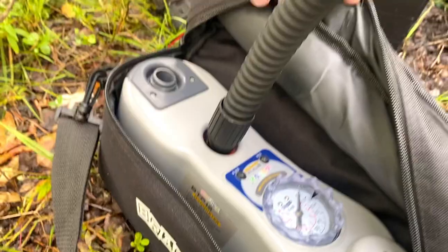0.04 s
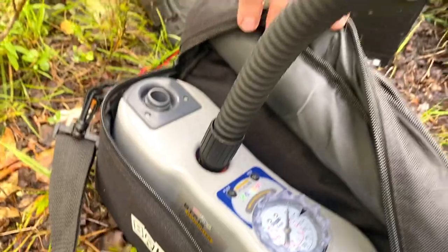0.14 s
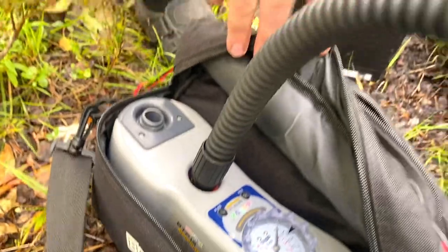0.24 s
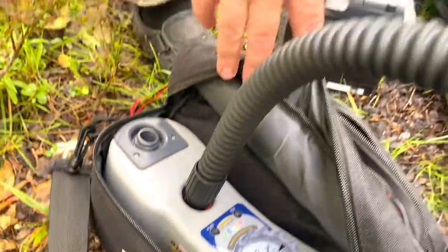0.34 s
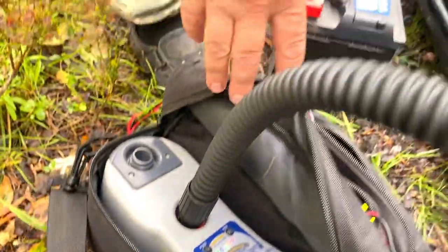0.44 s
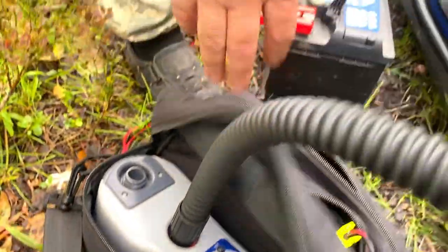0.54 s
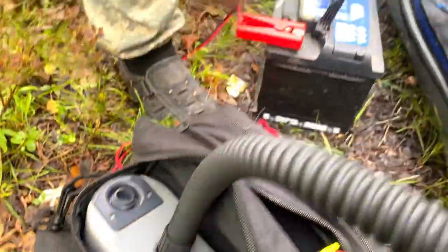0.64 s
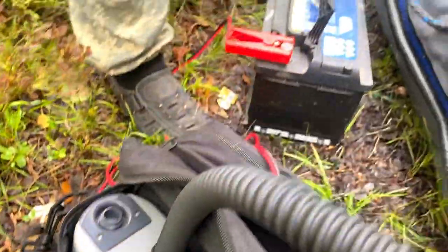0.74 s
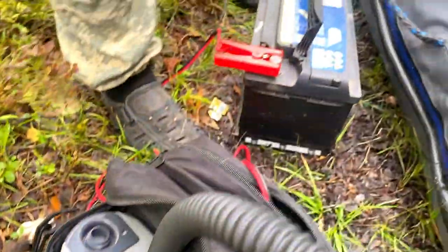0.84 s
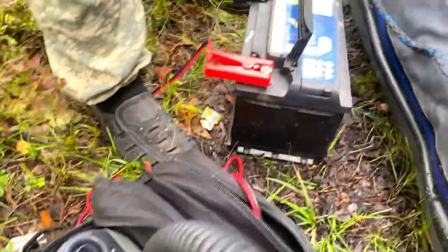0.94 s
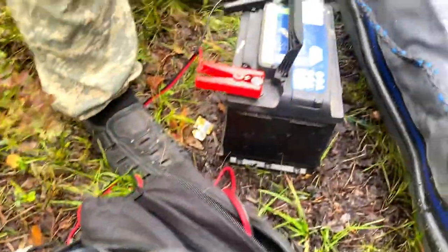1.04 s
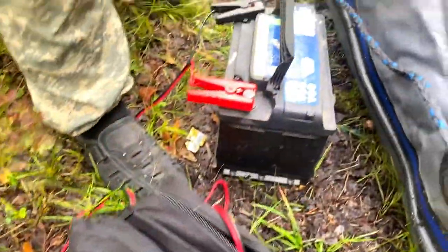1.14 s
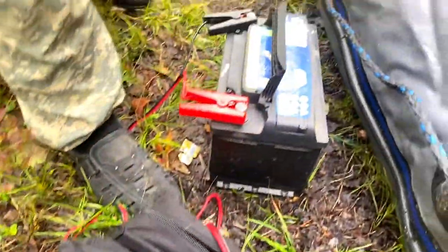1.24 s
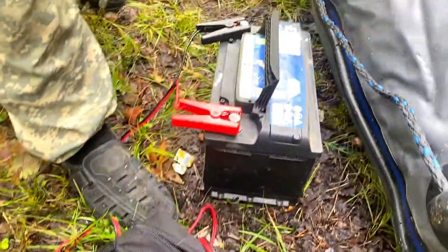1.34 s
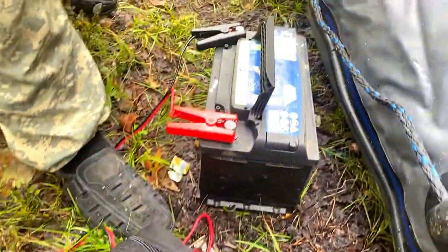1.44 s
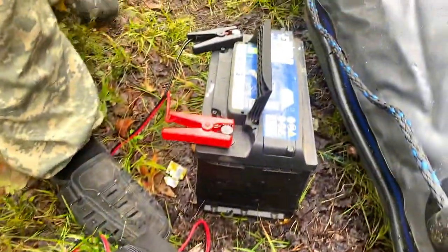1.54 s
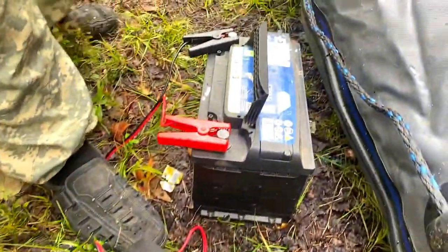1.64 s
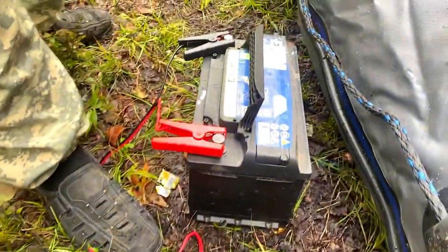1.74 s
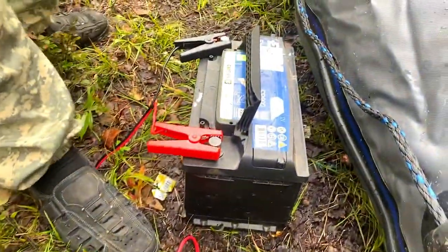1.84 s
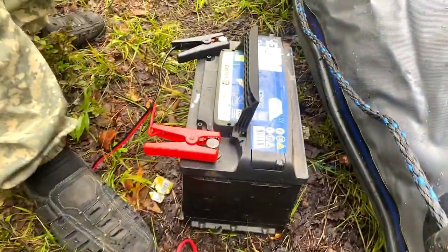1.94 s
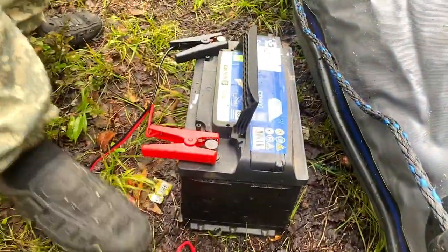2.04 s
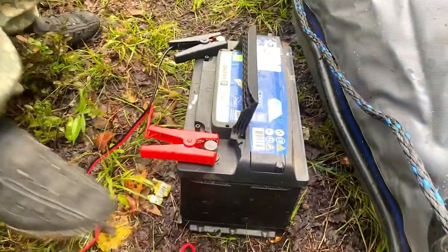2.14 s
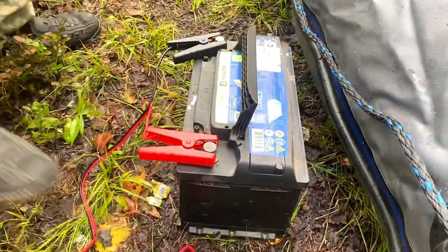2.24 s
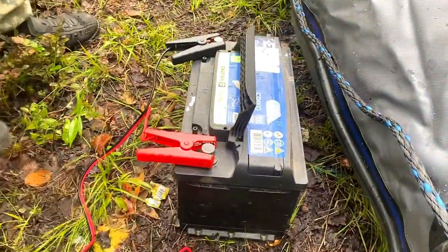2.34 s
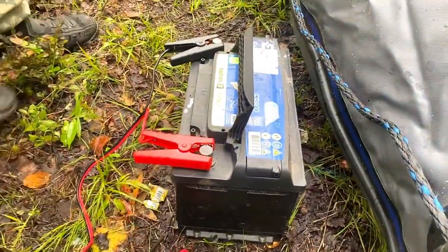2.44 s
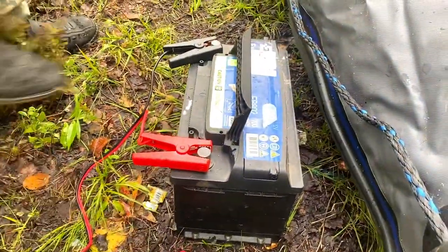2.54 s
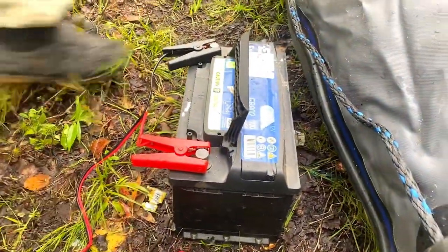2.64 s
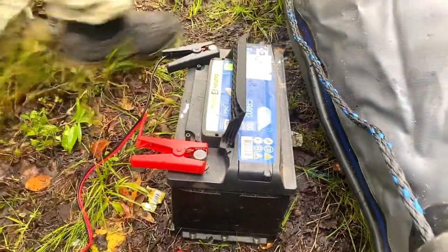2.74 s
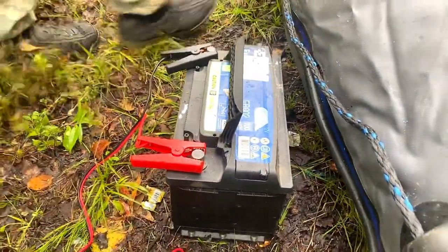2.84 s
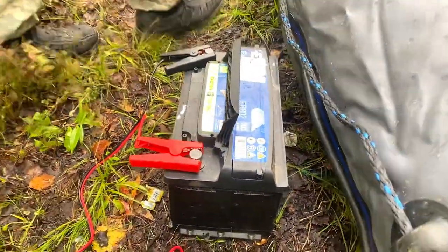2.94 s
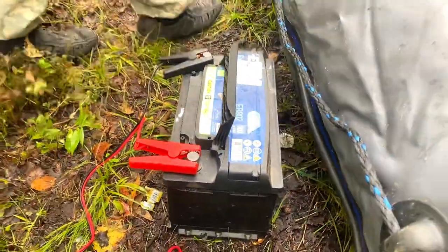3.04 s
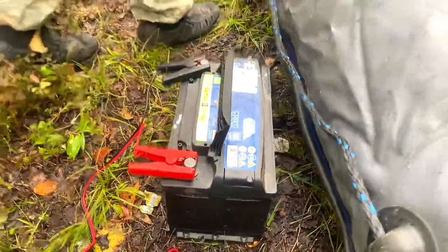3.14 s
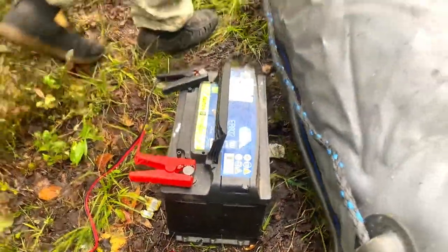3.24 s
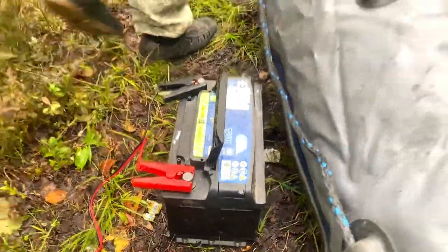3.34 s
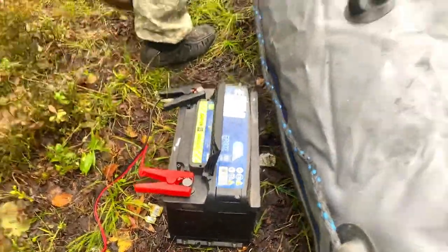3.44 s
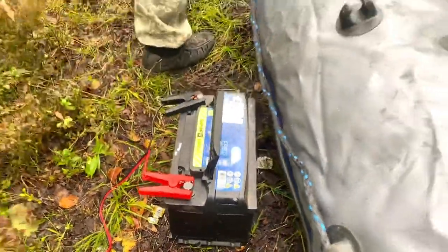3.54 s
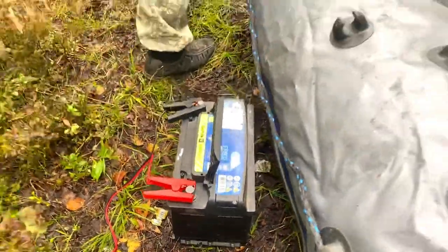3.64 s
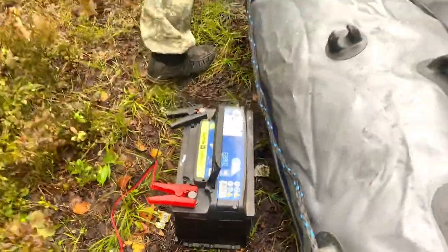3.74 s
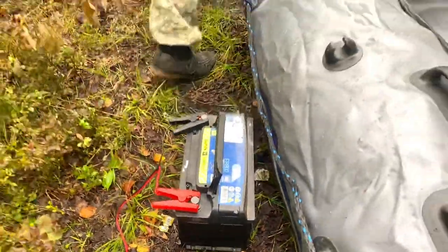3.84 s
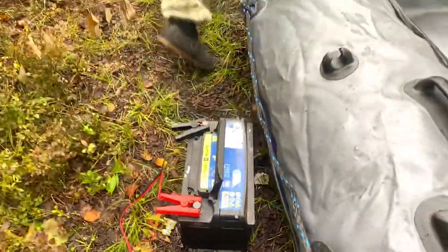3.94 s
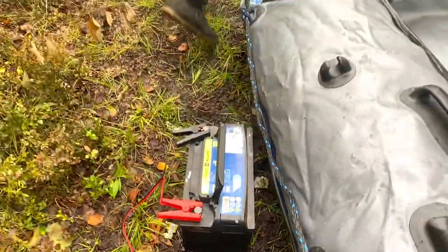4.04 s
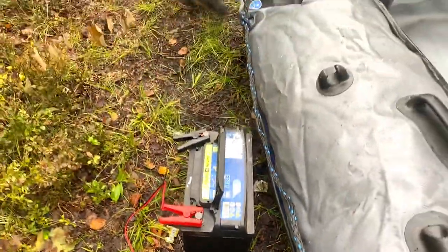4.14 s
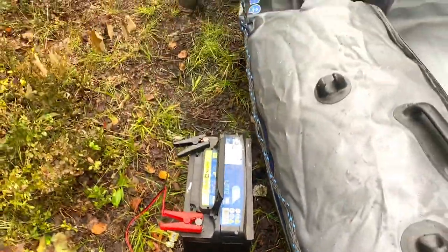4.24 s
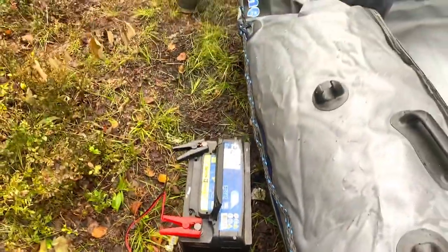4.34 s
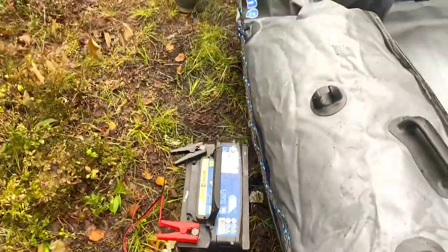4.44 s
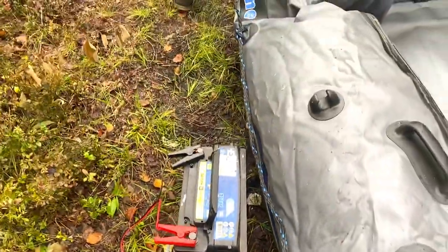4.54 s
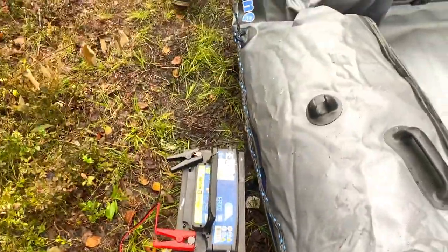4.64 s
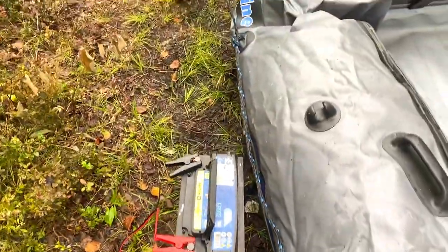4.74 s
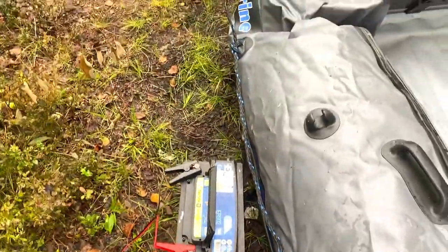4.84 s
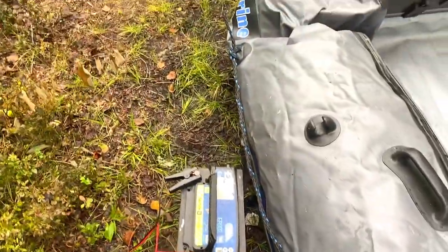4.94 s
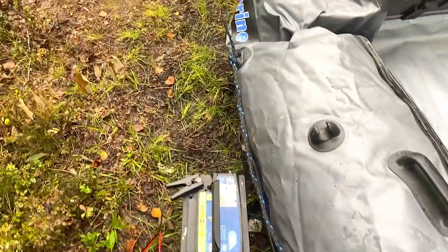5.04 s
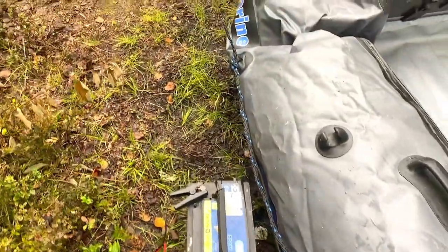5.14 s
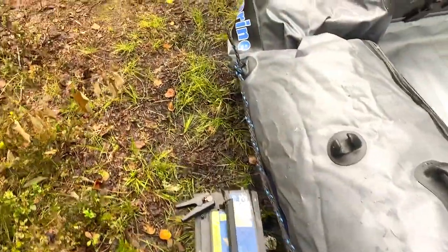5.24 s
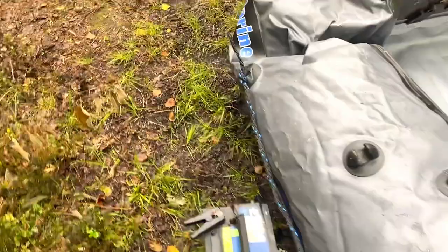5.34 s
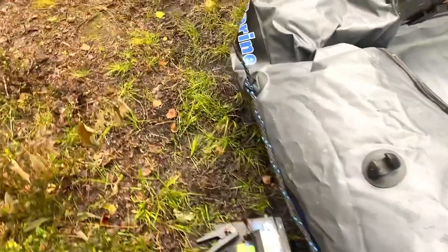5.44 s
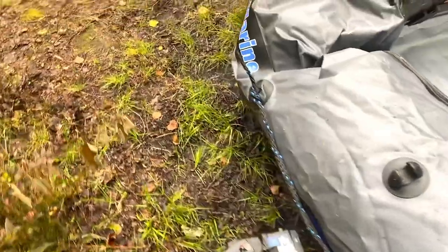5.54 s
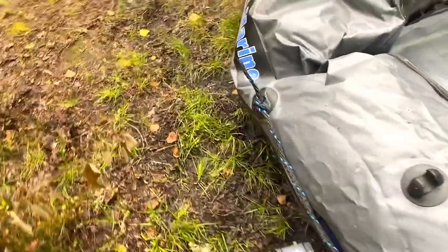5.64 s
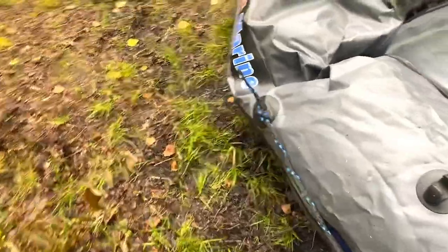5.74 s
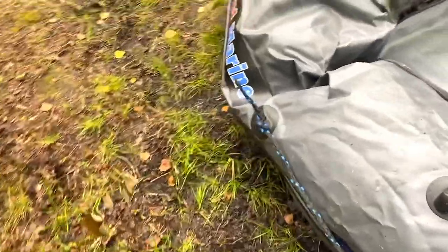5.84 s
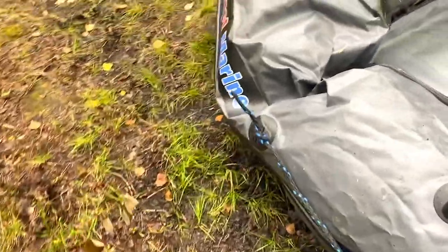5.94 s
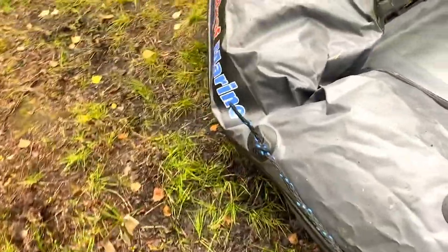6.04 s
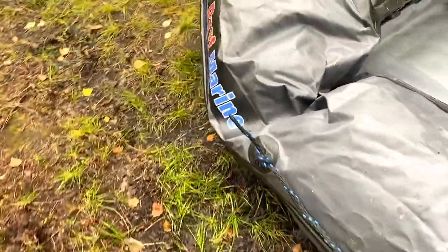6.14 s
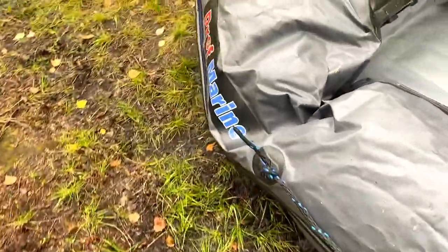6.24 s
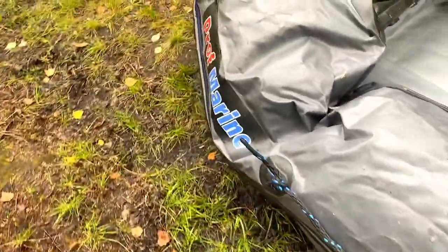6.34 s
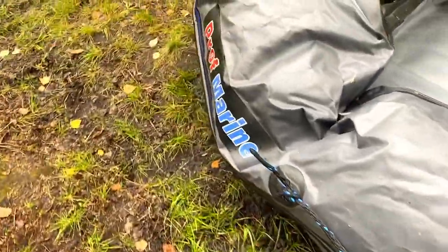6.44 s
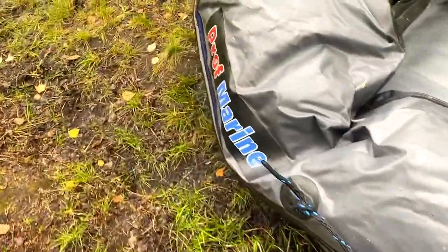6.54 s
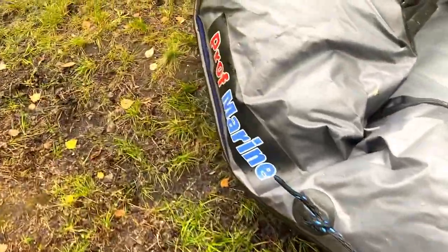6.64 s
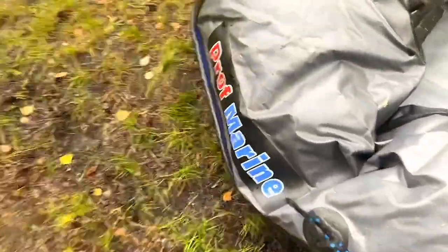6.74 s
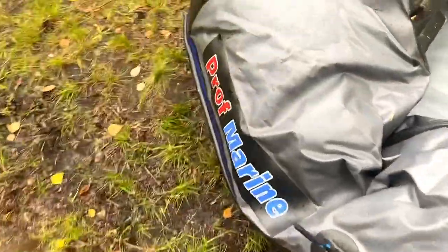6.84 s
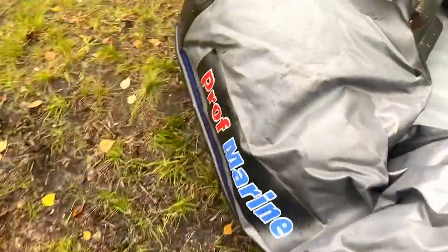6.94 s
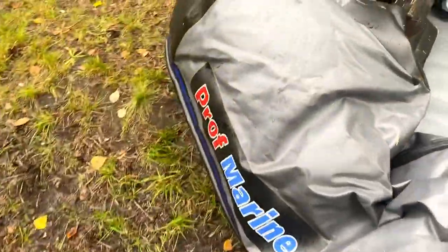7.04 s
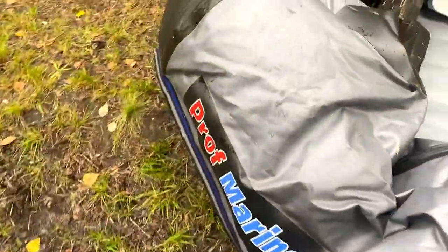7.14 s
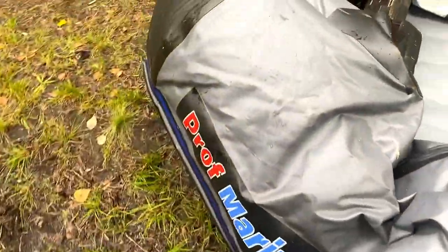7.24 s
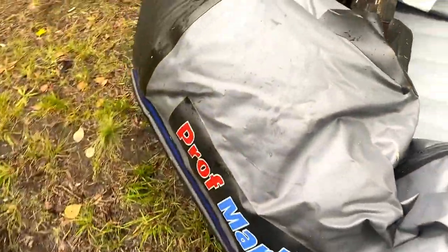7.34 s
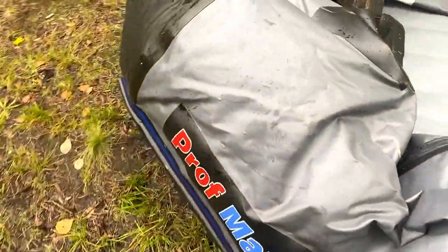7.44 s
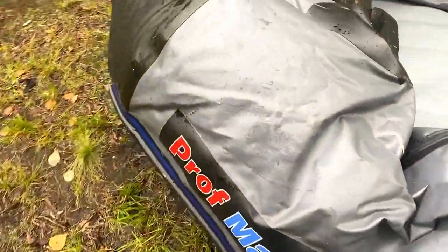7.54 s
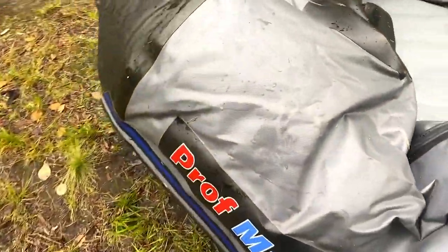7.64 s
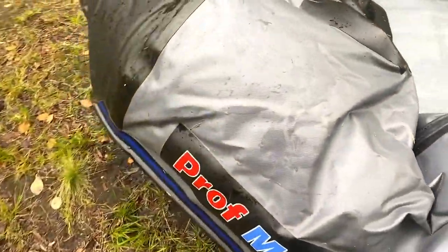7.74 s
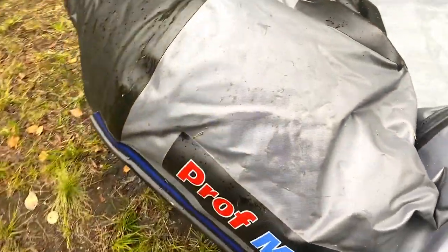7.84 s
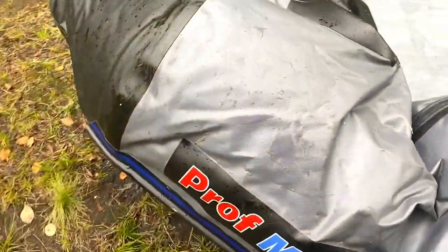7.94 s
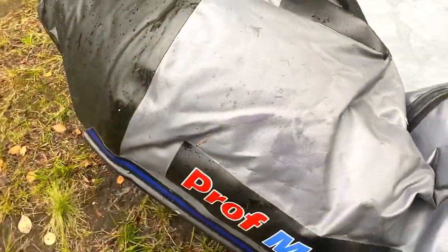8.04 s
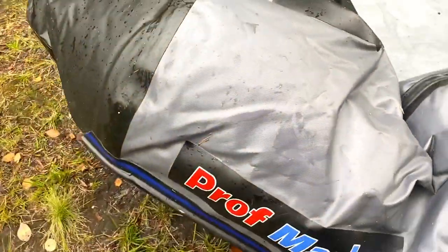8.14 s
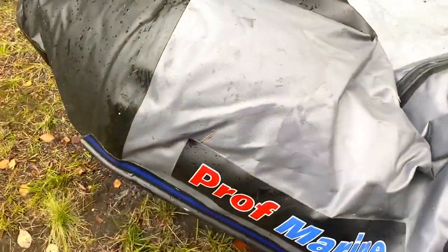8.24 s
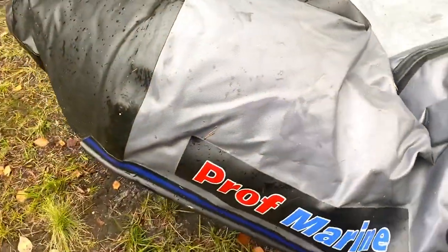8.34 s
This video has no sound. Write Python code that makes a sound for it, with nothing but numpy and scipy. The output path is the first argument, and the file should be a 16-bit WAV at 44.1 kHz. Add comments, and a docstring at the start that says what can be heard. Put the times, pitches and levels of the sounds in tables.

```python
"""A lake shore: a 12-volt blower pump fills a PVC boat, heard from a hand-held phone that drifts away from it.
The rotor hums once a turn and whines on higher multiples; a bearing adds tones between them; filtered noise is the air.
Whine, bearing and most of the air fade with distance; the hum and the roar in the hose follow level curves of their own.
Single tones swell or dip as the microphone crosses their lobes, and random echoes make the whine waver.
In the second half fabric swishes and ticks, and a few soft knocks and handling bumps sound."""
import sys
import numpy as np
from scipy import signal
from scipy.fft import rfft, irfft
from scipy.io import wavfile
from scipy.ndimage import map_coordinates

SR = 44100
rng = np.random.default_rng(int(sys.argv[2]) if len(sys.argv) > 2 else 0)


def file_out(sig):
    """Save sig as 16-bit WAV at sys.argv[1]."""
    # one column per channel
    cols = np.atleast_2d(sig).T
    # limit, then scale
    lim = np.clip(cols, -1, 1)
    pcm = np.round(lim * 32767).astype(np.int16)
    wavfile.write(sys.argv[1], SR, pcm)


N = 370440
TIME = np.arange(N) / SR  # [s]
SLIP = .5632  # slip rate of the bearing [per turn of the rotor]
NEAR_M = .5  # distance at which the near levels hold [m]

# bands in which the noise levels are given: name: (low edge [Hz], high edge [Hz])
BANDS = dict(case=(130, 300), hose=(550, 880), rush=(1440, 1800), spray=(3300, 4100), hiss=(9300, 10130),
         sizzle=(11640, 11980), cloth=(9000, 11000), hand=(35, 130))


def undb(db):
    """Decibels to gain."""
    return 10 ** (np.asarray(db) / 20)


def curve(table):
    """The value column of a timed table, drawn as straight lines through every sample."""
    seconds, values = np.transpose(table)
    return np.interp(TIME, seconds, values)


def bell(s, half):
    """A smooth rise and fall around time s."""
    return np.exp(-.5 * ((TIME - s) / half) ** 2)


def swells(table):
    """Envelope of (time [s], level [dB], half length [s]) events that add in power."""
    return np.sqrt(sum((undb(db) * bell(s, half)) ** 2 for s, db, half in table))


def walk(rate):
    """Smooth chance with spread near 1 that heads for a new random value rate times a second."""
    values = rng.standard_normal(8192)
    place = TIME * rate
    i = place.astype(int)
    part = place - i
    ease = part * part * (3 - 2 * part)
    return values.take(i, mode="wrap") + np.diff(values).take(i, mode="wrap") * ease


def noise(colour, band):
    """Noise of a (frequency [Hz], level [dB]) colour with unit rms inside the band."""
    hz = np.arange(N // 2 + 1) * SR / N
    points, db = np.transpose(colour)
    gain = undb(np.interp(np.log(hz + 1), np.log(points), db))
    # steeper fall outside the table
    gain *= np.minimum(hz / points[0], 1) ** 2
    gain *= np.minimum(points[-1] / (hz + 1), 1) ** 2
    inside = (hz > band[0]) & (hz < band[1])
    band_rms = np.sqrt(np.mean(gain ** 2 * inside))
    return irfft(rfft(rng.standard_normal(N)) * gain, N) / band_rms


def tone(angle, db):
    """One sine partial at the given phase angle and rms level, with a random starting phase."""
    return np.sqrt(2) * undb(db) * np.sin(angle + rng.uniform(0, 2 * np.pi))


def faded(far, db, fall_db):
    """Level in dB after far doublings of the distance."""
    return db - fall_db * far


def lobes(multiple):
    """Swells and dips in dB of one tone as the microphone crosses its lobes (+) and nulls (-)."""
    # (multiple of the rotor speed, time [s], half length [s], level change [dB])
    crossings = [(3, 0.088, 0.28, 8), (3, 1.16, 0.25, -8.5), (3, 2.4, 0.52, 5), (3, 5.37, 0.24, 7),
                 (4, 0.24, 0.28, 10), (4, 3.45, 0.59, 10), (4, 4.8, 0.53, 8), (4, 6.14, 0.11, 6),
                 (4, 7.9, 0.21, 3), (4, 8.25, 0.07, -12), (5, 0.31, 0.26, -8), (5, 0.78, 0.45, 4),
                 (5, 5.26, 0.18, 3.5), (5, 6.2, 0.75, -5), (6, 1.6, 0.18, -21), (6, 2.34, 0.21, 5.5),
                 (7, 0.51, 0.26, 10.5), (7, 2.3, 0.46, -7), (7, 4.26, 0.49, 11.5), (7, 8, 0.33, 23.5),
                 (9, 0.16, 0.26, -0.5), (9, .72, 0.045, -14), (9, 1.17, 0.043, -8), (9, 1.75, .4, 2),
                 (9, 2.68, .1, -9), (9, 4.25, 0.075, 5.5), (9, 4.83, 0.16, -4), (9, 5.22, 0.079, 6),
                 (9, 6.2, .12, -8), (9, 6.35, .074, 5), (9, 6.76, 0.15, -9), (9, 7.17, 0.064, 9.5),
                 (9, 7.6, .07, 9), (9, 7.9, .07, -6), (9, 8.12, 0.11, 8), (16.56, 3.55, .17, 8),
                 (16.56, 5.15, .15, 7), (17, 0.95, 0.07, -21), (17, 2, .17, -11), (17, 4.66, .12, -14),
                 (17, 5.05, .2, 5), (17, 5.72, .09, 7), (17, 6.9, 0.38, -9), (18, 0.1, 0.35, 8),
                 (18, 2.84, 0.12, -7), (18, 3.6, 0.3, 2.5), (18, 5.36, 0.19, 4), (18, 8.3, .15, -8),
                 (19, 4.25, 0.42, 9), (22, .3, .3, 7), (23, 0.1, 0.34, 7), (23, .9, .15, -10),
                 (23, 3.7, .28, -19), (24, 0.15, 0.36, 9), (24, 1.2, .3, -9), (24, 2.1, .3, 5),
                 (24, 5.65, .3, 7), (25, .2, .28, 4), (25, 5.1, .5, 5), (26, 0.2, 0.33, 13),
                 (27, 0.46, 0.12, -17), (27, 1.2, 0.3, 6.5), (27, 4.8, 0.35, 6), (27, 5.64, 0.12, -10)]
    return sum(db * bell(s, half) for order, s, half, db in crossings if abs(order - multiple) < .25)


def scattered(angle, db, multiple, echo_db, base_rate=7, rate_per_order=.4):
    """A partial plus echoes off ground and boat, which add and cancel at random, faster for short waves."""
    share = undb(np.minimum(echo_db, 0)) / np.sqrt(2)
    rate = base_rate + rate_per_order * multiple  # [per second]
    angle = angle + rng.uniform(0, 2 * np.pi)
    in_step = (1 + share * walk(rate)) * np.sin(angle)
    quarter_turn_off = share * walk(rate) * np.cos(angle)
    return undb(db) * (in_step + quarter_turn_off) / np.sqrt(.5 + share ** 2)


def handling(grip_db=-58, uneven_db=1.8):
    """The hand on the phone makes a low, uneven rumble that swells when the grip shifts."""
    # colour of the rumble: (frequency [Hz], level [dB])
    hand_colour = [(28, -36), (45, -4.5), (75, 3), (120, 0), (200, -3.5), (320, -5.5), (700, -16)]
    # shifts of the grip, before the unevenness: (time [s], level [dB], half length [s])
    grip_shifts = [(5.45, -55, .15), (6.7, -53, 0.25), (7.14, -45, .06), (7.93, -39.5, 0.065),
                   (7.96, -44, 0.24)]
    rumble = noise(hand_colour, BANDS["hand"])
    return rumble * np.hypot(undb(grip_db), swells(grip_shifts)) * undb(uneven_db * walk(22))


def knocks():
    """Soft blows: each is a low sine that swells and dies within a few cycles."""
    # knocks and bumps: (time [s], peak level of the envelope [dB], pitch [Hz], rise [cycles])
    blows = [(6.643, -38, 116, .7), (6.744, -36, 90, .7), (7.145, -37, 85, .7), (7.679, -35, 110, .8),
             (7.818, -35, 170, .8), (7.859, -22, 250, .35), (7.872, -26, 122, .7), (7.912, -27.5, 78, .6),
             (7.954, -19.5, 300, .45), (7.989, -23, 125, .55), (8.088, -35, 150, .6), (8.218, -35, 100, .7)]
    out = np.zeros(N)
    for s, db, hz, rise_cycles in blows:
        cycles = np.maximum(TIME - s, 0) * hz
        swell = cycles / rise_cycles * np.exp(1 - cycles / rise_cycles)
        out += undb(db) * swell * np.sin(2 * np.pi * cycles)
    return out


def ticks(decay_s=0.005):
    """Stalks and seams snap: a burst of band noise that starts at once and dies in a few milliseconds."""
    # sharp ticks of grass and fabric: (time [s], level at the start [dB], centre [Hz], width [Hz])
    snaps = [(6.803, -34, 10500, 2500), (7.187, -33, 11000, 6000), (7.287, -32, 7000, 9000),
             (7.388, -26, 10000, 11000), (7.396, -23, 5500, 9000)]
    out = np.zeros(N)
    for s, db, hz, width in snaps:
        edges = np.clip([hz - width / 2, hz + width / 2], 200, .45 * SR)
        band = signal.butter(2, edges, "band", fs=SR, output="sos")
        burst = signal.sosfilt(band, rng.standard_normal(N))
        decay = (TIME >= s) * np.exp(-np.clip((TIME - s) / decay_s, 0, 20))
        out += undb(db) * burst / burst.std() * decay
    return out


def fabric(grain_db=1.3, catch_db=1.4, crackle_rate=120, crackle_gain=0.58, crackle_s=0.0019):
    """Sliding fabric catches and slips on its weave: a grainy swish with sparse, short crackles in it."""
    # colour of the sliding fabric: (frequency [Hz], level [dB])
    cloth_colour = [(800, -12), (1500, -1), (3000, -1), (4500, 1), (6000, -3), (8000, -2), (10000, 0),
                    (12500, 2.5), (14000, -2), (15700, -7)]
    # swishes and scuffs of fabric and grass, before the grain: (time [s], level [dB], half length [s])
    scuffs = [(4.93, -49, 0.08), (7.205, -40.5, 0.042), (7.268, -39, 0.028), (7.39, -46, 0.075),
              (8.02, -52, 0.12)]
    snags = (rng.random(N) < crackle_rate / SR) * rng.exponential(size=N)  # crackle_rate a second
    crackle = signal.lfilter([1], [1, -np.exp(-1 / (crackle_s * SR))], snags)
    weave = undb(catch_db * walk(70) + grain_db * walk(600))
    return noise(cloth_colour, BANDS["cloth"]) * swells(scuffs) * np.hypot(weave, crackle_gain * crackle)


def airflow(angle, far, hose_db, chop=0.06, flicker_db=0.7, low_shade=0.05, hiss_shade=0.14, drift=.01):
    """Turbulence booms in the case, roars in the hose and hisses at the intake, chopped lightly once a turn."""
    # colours from low to high: (frequency [Hz], level [dB])
    case_colour = [(50, -30), (90, -13), (130, -11.5), (180, 1.5), (260, -4), (340, -13), (600, 2)]
    hose_colour = [(300, -34), (420, -17), (540, -11.5), (630, -3), (725, 2), (850, -6), (980, -11),
                   (1180, -10), (1400, -44), (2500, -53)]
    rush_colour = [(600, -27), (1000, -2), (1350, 1), (1600, 2.5), (2000, 1), (2500, -5.5), (3000, -21),
                   (5000, -10.5), (9000, -23)]
    spray_colour = [(1200, -6), (2300, 6), (3200, 3.5), (3900, 1.5), (4400, 2), (5050, -7.5), (5550, -13),
                    (6200, -7.5), (7300, -36), (8000, -17), (10000, -37), (15000, -32)]
    hiss_colour = [(4400, 4), (5050, 2), (5550, 7), (6100, -3.5), (7300, -0.5), (7900, 2), (8700, 3),
                   (9200, -2.5), (10200, 2), (10800, -6), (13500, -4), (15500, -24)]
    sizzle_colour = [(10000, -22), (11100, -6), (11750, 1.5), (12500, 2), (13100, -2), (13800, -15),
                     (15000, -27)]
    # strengths before shade and flicker: (level at NEAR_M [dB], fall per doubling of distance [dB])
    case_db = (-44.5, 6)
    rush_db = (-39.5, 3)
    spray_db = (-42.5, 0.76)
    hiss_db = (-46, 6.5)
    sizzle_db = (-42.5, 10)
    # early on the hose and bag shade the intake; the sizzle takes the full depth, the rest a share:
    # (centre [s], half length [s], depth [dB])
    shade = (0.34, 0.31, -6)
    centre, half, depth_db = shade
    shade_db = depth_db * bell(centre, half)
    low_shade_db = low_shade * shade_db

    case = noise(case_colour, BANDS["case"]) * undb(faded(far, *case_db) + low_shade_db)
    drifting = np.cumsum(1 + drift * walk(3))  # the hose resonance wanders with the flow
    roar = map_coordinates(noise(hose_colour, BANDS["hose"]), [drifting], order=3, mode="mirror")
    hose = roar * undb(hose_db)
    rush = noise(rush_colour, BANDS["rush"]) * undb(faded(far, *rush_db) + low_shade_db)
    spray = noise(spray_colour, BANDS["spray"]) * undb(faded(far, *spray_db) + low_shade_db)
    hiss = noise(hiss_colour, BANDS["hiss"]) * undb(faded(far, *hiss_db) + hiss_shade * shade_db)
    sizzle = noise(sizzle_colour, BANDS["sizzle"]) * undb(faded(far, *sizzle_db) + shade_db)
    chopped = (1 + chop * np.sin(angle)) * undb(flicker_db * walk(45))
    return case + hose + (rush + spray + hiss + sizzle) * chopped


def bearing(angle, far, trim_db=-0.1, fall_db=7, fade_db=2.0):
    """The shaft overtakes the ball cage at the slip rate, which puts side tones around the rotor orders."""
    # tones one slip rate above an order: (rotor order, level at NEAR_M before trim, lobes and fading [dB])
    upper_tones = [(2, -44), (3, -46), (4, -37.5), (5, -48), (6, -36.5), (8, -49.5), (16, -49.5)]
    # tones one slip rate below an order, same columns: (rotor order, level [dB])
    lower_tones = [(4, -46.5), (5, -61), (6, -42), (18, -52.5), (21, -52)]
    slip = SLIP * angle + 0.59 * walk(14)  # the slip phase wanders [radians]
    out = 0
    for side, table in ((1, upper_tones), (-1, lower_tones)):
        for order, db in table:
            level_db = faded(far, db + trim_db, fall_db) + lobes(order + side * SLIP) + fade_db * walk(5)
            out = out + tone(order * angle + side * slip, level_db)
    return out


def whine(angle, far, echo_db=-20, echo_growth_db=6, weak_echo=0.45):
    """Rotor overtones fade with distance and pass through lobes; echoes grow for weak tones and a far microphone."""
    # overtones: (multiple of the rotor speed, level at NEAR_M before lobes [dB], fall per doubling of distance [dB])
    overtones = [(3, -33.5, 3.5), (4, -34.5, 4.5), (5, -26, 6.5), (6, -39.5, 10.5), (7, -41, 16),
                 (8, -50.5, 0), (9, -41, 5.5), (12, -48.5, 5), (14, -49.5, 6.5), (15, -48.5, 9),
                 (17, -43.5, 5.5), (18, -39.5, 5.5), (19, -47, 6.5), (20, -50.5, 6), (22, -53, 9),
                 (23, -48, 7), (24, -48.5, 9), (25, -44, 13), (26, -55, 7), (27, -38.5, 7), (28, -49, 14)]
    top_db = max(db for _, db, _ in overtones)
    out = 0
    for multiple, db, fall_db in overtones:
        lobe_db = lobes(multiple)
        echoes_db = echo_db + echo_growth_db * far + weak_echo * (top_db - db)
        echoes_db = echoes_db - .5 * np.minimum(lobe_db, 10)  # a lobe lifts the direct sound over its echoes
        out = out + scattered(multiple * angle, faded(far, db, fall_db) + lobe_db, multiple, echoes_db)
    return out


def hum(angle, hose_db, octave_db=-6.5):
    """The strong once-a-turn tone, slightly unsteady; its weak octave comes out of the hose with the air."""
    # the once-a-turn tone before its flutter: (time [s], level [dB])
    hum_level = [(0, -14), (0.7, -18.5), (1.22, -15), (1.66, -17.5), (2.22, -13.5), (2.53, -13),
                 (2.78, -15), (3.13, -13.5), (3.86, -18.5), (4.26, -17.5), (4.54, -19.5), (5.19, -15.5),
                 (5.82, -15), (7.09, -20), (7.81, -21.5), (8.21, -20), (8.4, -22)]
    # the level flutters briefly: (centre [s], half length [s], rate [Hz], depth [dB])
    flutter_setting = (3.95, .22, 21, .75)
    # the hum hiccups once: (time [s], phase step [radians])
    hiccup_setting = (2.013, .7)
    centre, half, hz, depth_db = flutter_setting
    flutter_db = depth_db * bell(centre, half) * np.sin(2 * np.pi * hz * TIME)
    when, step = hiccup_setting
    hiccup = step * np.clip((TIME - when) / .006 + .5, 0, 1)  # the phase steps over 6 ms
    octave = tone(2 * angle, hose_db + octave_db)
    return tone(angle + hiccup, curve(hum_level) + flutter_db + 0.08 * walk(40)) + octave


def scene():
    """The pump in the open air, with the small sounds near the microphone."""
    # rotor speed, before a slight wander: (time [s], turns per second [Hz])
    speed = [(0, 463.3), (.45, 463.5), (.8, 462.2), (1.15, 461.9), (1.6, 462.4), (4.9, 462.9), (5.3, 463.3),
             (6.4, 463.1), (7.5, 463.2), (8.4, 462.4)]
    # from pump to microphone: (time [s], distance [m])
    distance = [(0, 0.5), (.5, 0.68), (1.15, 0.53), (2.4, 0.52), (3.3, 0.53), (4.3, 0.8), (5.2, 0.91),
                (6.1, 1.19), (7, 1.58), (7.7, 1.88), (8.4, 1.46)]
    # the roar in the hose: (time [s], level [dB])
    roar_level = [(0, -28.5), (.6, -31), (2.3, -28), (4, -34.5), (4.35, -34.5), (4.7, -37.5), (5.15, -35.5),
                  (5.7, -36), (6.1, -40.5), (7.05, -48.5), (7.5, -44), (8.4, -44.5)]
    angle = 2 * np.pi * np.cumsum(curve(speed) + .12 * walk(18)) / SR
    far = np.log2(curve(distance) / NEAR_M)  # doublings of the distance
    hose_db = curve(roar_level)
    near_sounds = handling() + knocks() + ticks() + fabric()
    air = airflow(angle, far, hose_db)
    tones = bearing(angle, far) + whine(angle, far) + hum(angle, hose_db)
    return (near_sounds + air + tones)[None]


def record(dry):
    """The phone cuts the deepest bass below 45 Hz and, steeply, the top above 15.5 kHz."""
    dry = signal.sosfilt(signal.butter(3, 45, "high", fs=SR, output="sos"), dry)
    return signal.sosfilt(signal.ellip(10, .1, 80, 15500, fs=SR, output="sos"), dry)


dry = scene()
out = record(dry)
file_out(out)
```